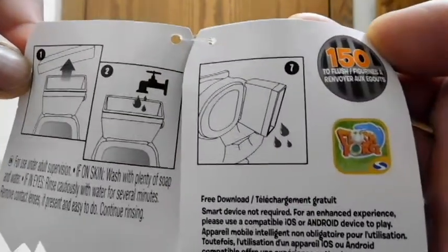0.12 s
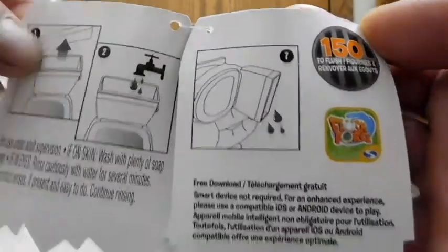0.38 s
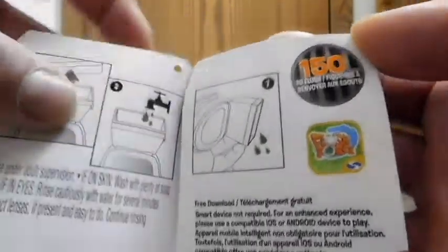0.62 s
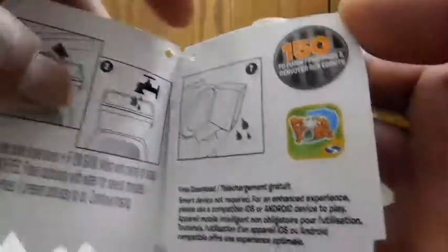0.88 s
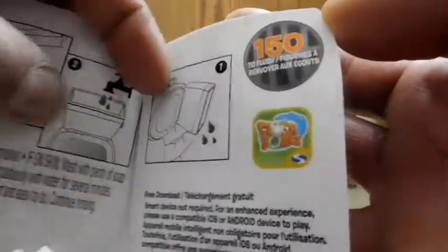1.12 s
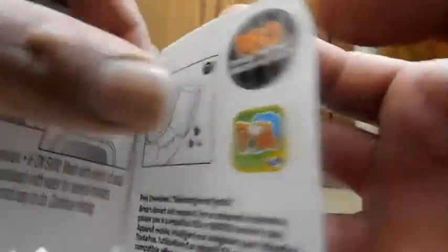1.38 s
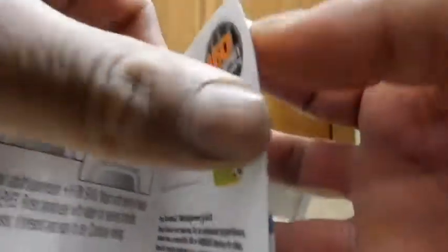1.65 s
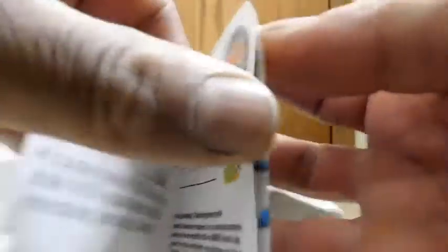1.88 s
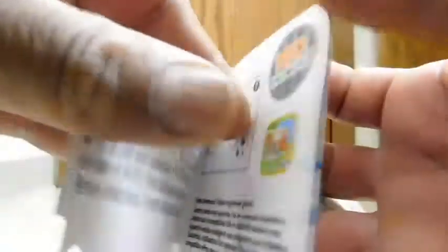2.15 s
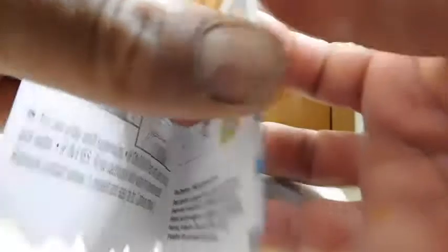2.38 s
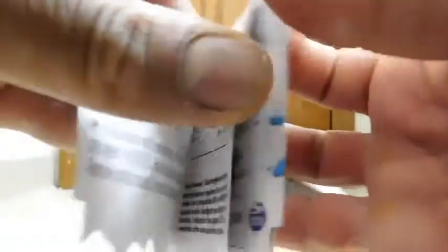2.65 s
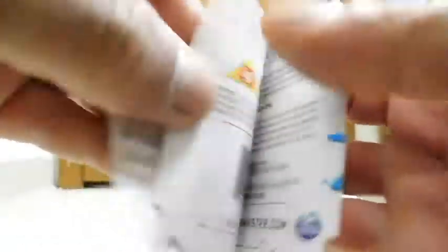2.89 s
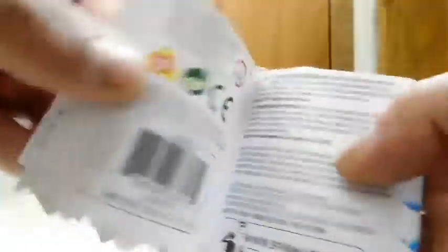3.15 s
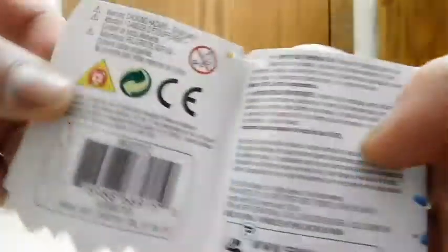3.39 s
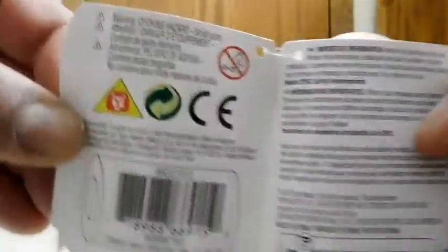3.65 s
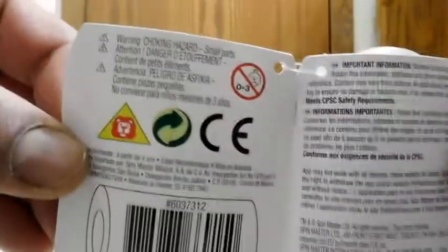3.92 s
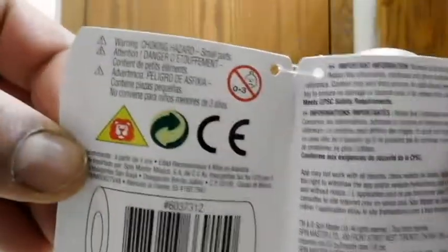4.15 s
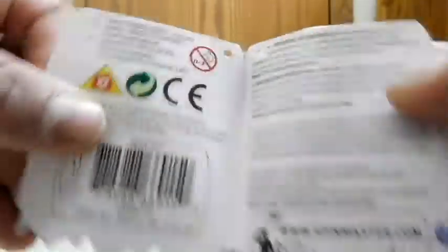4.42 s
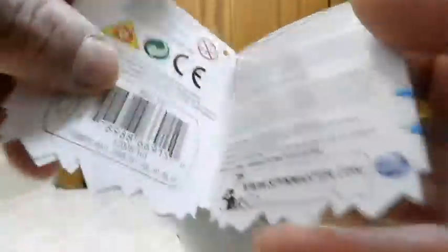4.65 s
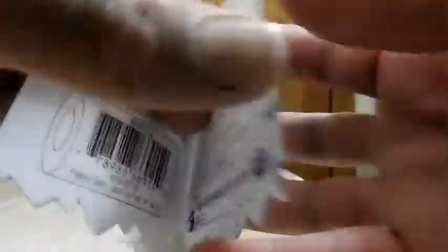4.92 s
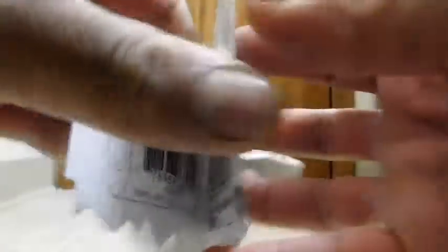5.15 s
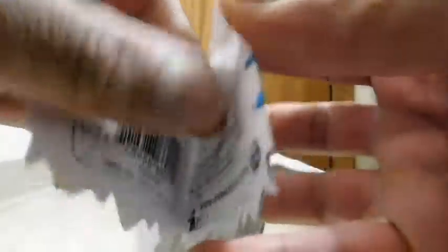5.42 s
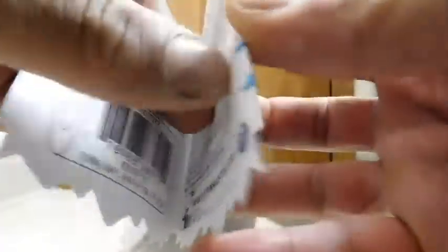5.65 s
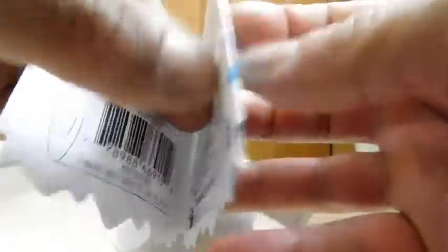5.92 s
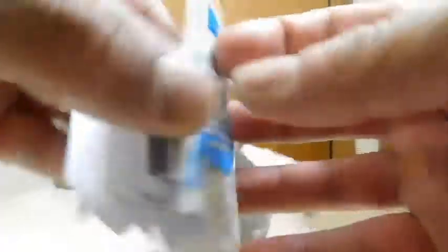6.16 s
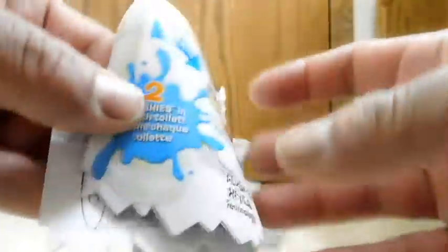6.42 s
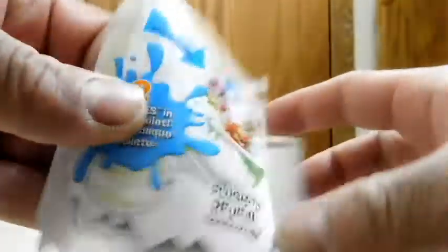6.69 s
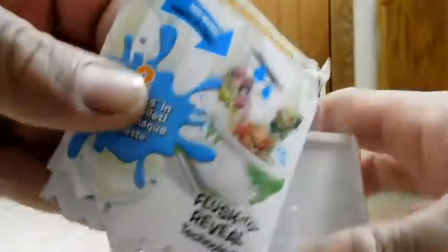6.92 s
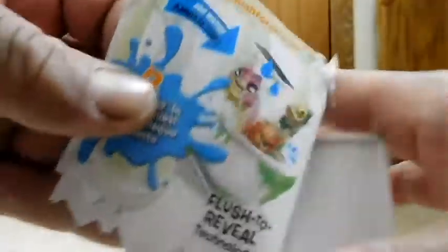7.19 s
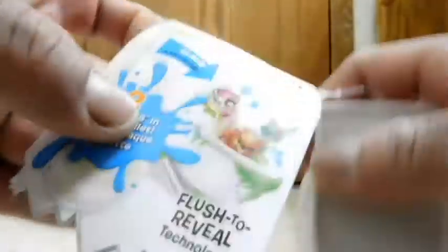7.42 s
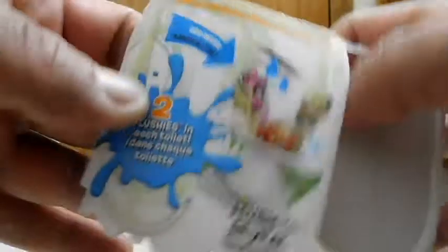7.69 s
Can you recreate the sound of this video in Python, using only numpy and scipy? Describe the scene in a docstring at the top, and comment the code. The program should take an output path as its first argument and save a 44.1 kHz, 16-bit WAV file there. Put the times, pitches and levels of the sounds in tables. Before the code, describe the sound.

Fingers turn and bend thin but stiff pages right by the microphone. Creases pop with short papery ticks, some with small dull thumps, and dry skin whispers across the sheets. The bursts are irregular, with near-quiet holds between them and the busiest crackling toward the end. A short room echo follows each snap, above steady low hum and soft air noise.

```python
"""Turning the pages of a paper leaflet

Fingers turn small stiff pages close to a stereo microphone, over mains hum, room air and hiss.
Creases snap as short decaying tones with thumps and noisy cracks; fingertips slide as filtered random slips.
A soft rustle of noise and ticks follows the hands, and low body thumps accompany some of the snaps.
A small hard room answers the snaps and slides with sparse, dying echoes."""
import sys
import numpy as np
from scipy import signal
from scipy.fft import rfft, irfft
from scipy.io import wavfile
from scipy.ndimage import uniform_filter1d

SR = 44100
rng = np.random.default_rng(int(sys.argv[2]) if len(sys.argv) > 2 else 0)


def digitize_waveform(pressure):
    """Quantize a signal to 16-bit integers and store it at the path in sys.argv[1].

    Rows of a 2-D input are taken as channels; values are limited to [-1, 1].
    """
    field = np.atleast_2d(pressure).T
    bounded = np.clip(field, -1, 1)
    quanta = np.round(bounded * 32767).astype(np.int16)
    wavfile.write(sys.argv[1], SR, quanta)


def invert_db(level):
    """Linear amplitude ratio for a level in decibels (20 dB per decade), elementwise."""
    return 10 ** (np.asarray(level, dtype=float) / 20)


N = 344332  # length of the scene in samples

# how the pages are held: t/s, thump relative to patch/dB, air pocket ring/dB,
# cycles until a patch dies to about a third
GRIP = [(.5, -4, -4, 0.94), (1.4, -47, -7, 0.95), (1.8, -10.5, -6, 1.7), (2.2, -4, -12, 1.2),
        (2.9, -9, 3.5, 1.5), (3.5, -12, -15, 0.71), (4.4, -11.5, -0.5, 0.77), (4.55, -7, -3.5, 1.9),
        (5.4, -2, 0, 0.35), (5.9, -3, -5, 1.4), (6.5, -10, 0.5, 3.5), (7.3, -6.5, 5, 2.2),
        (7.55, -28, -11.5, 0.44)]


def evened(x):
    """Scales a sound to an rms of 1."""
    return x / np.sqrt(np.mean(x ** 2) + 1e-20)


def read(points, hz):
    """Reads a table between its points on a log-frequency axis."""
    f, value = np.transpose(points)
    return np.interp(np.log(hz + 1), np.log(f + 1), value)


def add(mix, s, sound):
    """Mixes a two-channel sound in at time s, cut off at the end of the mix."""
    part = mix[:, round(s * SR):][:, :sound.shape[1]]
    part += sound[:, :part.shape[1]]


def band(x, lo_hz, hi_hz):
    """Keeps the pitches between two limits, using a filter that never looks ahead."""
    limits = [lo_hz, min(hi_hz, SR * .45)]
    return signal.sosfilt(signal.butter(2, limits, "bandpass", fs=SR, output="sos"), x)


def noise(shape_db, same):
    """Makes two partly alike channels of noise with a given spectrum and an rms of 1."""
    hz = np.fft.rfftfreq(N, 1 / SR)
    left, other = rfft(rng.standard_normal((2, N)))
    alike = np.clip(read(same, hz), 0, 1)
    right = alike * left + np.sqrt(1 - alike ** 2) * other
    return evened(irfft(np.array([left, right]) * invert_db(read(shape_db, hz)), N))


def panned(x, db):
    """Splits a left-right level step in half over both channels."""
    return x * invert_db(np.outer([.5, -.5], db))


def air():
    """Room air and microphone hiss: steady noise, alike in both channels only in the bass."""
    # colour of the noise: f/Hz, relative level per Hz/dB
    colour = [(27, 5), (42, 0), (150, -4), (330, -3), (600, -5.5), (1200, -2), (2200, -5.5), (4000, -12),
              (8000, -18.5), (16000, -19)]
    # how alike left and right are: f/Hz, likeness (0 to 1)
    same = [(60, 0.79), (1000, 0.011), (3000, 0)]
    return invert_db(-53) * noise(colour, same)


def hum():
    """Mains hum: steady tones locked to multiples of twice the mains frequency."""
    # tones of the hum: multiple, rms level before panning/dB, left-right step/dB, lead of left/rad
    tones = [(1, -52.5, -0.8, 0.07), (3, -68.5, -5.5, 0.46), (8, -62.5, -4, -0.6), (9, -71, 20.5, -2),
             (10, -52, -0.5, 0.18), (11, -62, 5, 1.26)]
    turn = 2 * np.pi * 120.028 * np.arange(N) / SR  # 120.028 Hz is twice the mains frequency
    total = np.zeros((2, N))
    for multiple, db, pan_db, lead in tones:
        phase = np.array([[lead], [0]]) + rng.uniform(0, 2 * np.pi)
        total += panned(np.sqrt(2) * invert_db(db) * np.cos(multiple * turn + phase), pan_db)
    return total


def low_thumps():
    """Low body thumps under some of the snaps: a few deep tones that start softly and die away."""
    # low thumps: t/s, strength/dB
    thumps = [(0.53, -42.5), (1.845, -43.5), (2.192, -39), (3.748, -42), (4.383, -39), (4.546, -41.5),
              (7.282, -43.5), (7.526, -42)]
    # low tones of the thump: f/Hz, relative level/dB, time to fall by 60 dB/s
    tones = [(156, 14, 0.028), (267, 0, 0.074), (316.4, 4.5, 0.083)]
    t = np.arange(SR // 2) / SR
    pulses = np.zeros(N)
    for s, db in thumps:
        pulses[round(s * SR)] = invert_db(db)
    body = sum(invert_db(db - 60 * t / t60) * np.sin(2 * np.pi * hz * t) for hz, db, t60 in tones)
    soft_start = 1 - np.exp(-t / 0.0047)
    return signal.oaconvolve(pulses, body * soft_start)[:N]


def rustle(ticks_per_s=150, spread_db=3.5, tick_db=-2):
    """Moving hands make the sheets rustle: an uneven wash of noise with small random ticks."""
    # how loud the rustle is: t/s, level before the ticks are added/dB
    s, level_db = np.transpose([(0, -97), (0.39, -66), (0.429, -57.5), (1.3, -62.5), (2.801, -57),
                                (3.1, -50.5), (3.7, -62), (3.85, -79), (4.28, -90), (4.45, -48.5),
                                (4.75, -62.5), (6.35, -61.5), (6.601, -60), (7.349, -60), (7.8, -59.5)])
    # colour of the papery wash: f/Hz, relative level per Hz/dB
    colour = [(300, -7.5), (800, -4), (2400, -2), (4500, -15.5), (8000, -14), (16000, -21.5)]
    tick_sizes = invert_db(spread_db * np.minimum(rng.exponential(1, N), 3))
    ticks = (rng.random(N) < ticks_per_s / SR) * tick_sizes
    ticks = evened(band(ticks, 870, 3460))
    lumps_db = 3.8 * evened(uniform_filter1d(rng.standard_normal(N), size=1500))
    wash = noise(colour, [(500, 0.99), (4000, 0.056)]) * invert_db(lumps_db)
    level = invert_db(np.interp(np.arange(N) / SR, s, level_db))
    return level * (wash + invert_db(tick_db) * ticks)


def room(x):
    """A small hard room: sparse echoes of random sign, each pitch range dying at its own speed."""
    # how long echoes last: f/Hz, time to fall by 60 dB/s
    decay = [(300, 0.41), (2000, 0.49), (6000, 0.37), (15000, 0.57)]
    taps = np.zeros((2, SR // 2))
    starts = np.arange(200, SR // 2 - 20, 20)
    at = starts + rng.integers(0, 20, (2, len(starts)))  # one echo in every 20 samples
    np.put_along_axis(taps, at, rng.choice([-1., 1.], at.shape), 1)
    hz, t, z = signal.stft(taps, SR, nperseg=256)
    fading = z * invert_db(-60 * t / read(decay, hz)[:, None])
    tail = signal.istft(fading, SR, nperseg=256)[1]
    tail = tail / np.linalg.norm(tail[0])
    return signal.fftconvolve(x.mean(0)[None], tail, axes=1)[:, :N]


def slide(length, level_db, hz, hiss_db, slips_per_cycle=.3, spread_db=5):
    """Uneven slips of skin on paper: trapped air whistles, wider and brighter for a rougher stroke."""
    n = round(length * SR)
    sizes = invert_db(spread_db * np.minimum(rng.exponential(1, (3, n)), 3))
    slips = (rng.random((3, n)) < slips_per_cycle * hz / SR) * sizes
    slips = (slips[0] + .7 * slips[1:]) * rng.choice([-1, 1], n)  # one shared set, two separate ones
    slips = slips + .15 * rng.standard_normal((2, n))
    slips = np.pad(slips * signal.windows.tukey(n, .5), ((0, 0), (0, 1500)))  # room to ring out
    wide = 1 + 1700 * invert_db(hiss_db) / hz
    whistle = evened(band(slips, hz / wide, hz * wide))
    scrape = 2.97 * evened(band(slips, 720, 2670)) + evened(band(slips, 8100, 13900))
    make_up = np.sqrt(slips.shape[1] / n)  # makes up for the silent padding
    return invert_db(level_db) * (whistle + invert_db(hiss_db) * scrape) * make_up


def slides():
    """Skin or a page edge slides over a sheet; a closing grip shuts the pockets and alters the scrape."""
    # strokes: t/s, length/s, rms level of the whistle before panning/dB, whistle f/Hz
    strokes = [(0.406, 0.073, -61.5, 2520), (0.824, 0.063, -62, 2760), (1.864, 0.092, -60, 1940),
               (2.671, 0.013, -61.5, 2220), (2.844, 0.034, -56, 2570), (3.01, 0.02, -48.5, 2550),
               (3.063, 0.044, -54, 2440), (3.109, 0.011, -59, 2400), (4.327, 0.065, -56.5, 2290),
               (4.486, 0.018, -62, 2210), (4.561, 0.011, -53.5, 2020), (4.581, 0.02, -65, 2020),
               (4.624, 0.011, -60.5, 3430), (5.361, 0.032, -50, 2930), (5.64, 0.07, -66, 6300),
               (5.72, 0.08, -60.5, 3120), (5.877, 0.06, -61, 6760), (5.942, 0.03, -61, 7050),
               (6.031, 0.052, -65, 6750), (6.162, 0.12, -60, 2020), (6.762, 0.048, -59, 2220),
               (6.976, 0.068, -56, 3070), (7.105, 0.093, -59, 3060), (7.198, 0.06, -54, 2500),
               (7.375, 0.011, -55, 2700), (7.505, 0.064, -59, 3480)]
    held_s, _, ring_db, _ = np.transpose(GRIP)
    total = np.zeros((2, N))
    for s, length, db, hz in strokes:
        # scrape relative to whistle: it falls by 1.33 dB for each dB of pocket ring
        hiss_db = -13.5 - 1.33 * np.interp(s, held_s, ring_db)
        add(total, s, slide(length, db, hz, hiss_db))
    return total


def ring(hz, near=.11):
    """Air pockets nearest in pitch to the moving patch ring on, each as a close pair that beats."""
    # air pockets between pages and hands: f/Hz, relative level/dB, time to fall by 60 dB/s
    pockets = [(1940, -3.5, 0.043), (2426, -15.5, 0.037), (3600, -10, 0.0055)]
    t = np.arange(3000) / SR
    total = np.zeros(len(t))
    for _ in range(2):
        for f, db, t60 in pockets:
            closeness = np.exp(-(np.log(f / hz) / near) ** 2)
            tone = np.sin(2 * np.pi * f * rng.uniform(.96, 1.04) * t)
            total += invert_db(db - 60 * t / t60) * closeness * tone
    return total


def snap(peak_db, hz, thump_db, crack_db, ring_db, cycles):
    """A crease buckles: a ringing patch, a push of air, a crack, a crackle and a bounce off the next page."""
    t = np.arange(3000) / SR
    rise = 1 - np.exp(-t / .00013)
    burst = rng.standard_normal((3, len(t))) * rise
    flex = np.exp(-t * hz / max(cycles, .3)) * np.sin(2 * np.pi * hz * t)
    patch = -rise * (flex + invert_db(ring_db) * ring(hz))
    patch = patch + min(hz / 5000, .5) * band(burst[0] * np.exp(-t / 0.00068), 2830, 6330)
    strength = np.linalg.norm(patch[:150])  # the other parts are set relative to this
    thump = -band(1. * (t == 0), 510, 1900)
    crack = band((burst[0] + burst[1:]) * np.exp(-t / 0.0009), 1600, 12400)
    sound = patch + strength * invert_db(thump_db) * thump / np.linalg.norm(thump)
    sound = sound + strength * invert_db(crack_db) * crack / np.linalg.norm(crack[0])
    jumps = rng.standard_normal((2, len(t))) * rng.exponential(1, len(t)) ** 2
    crackle = band(jumps * rise * np.exp(-t / 0.038), 660, 6600)
    sound = sound + strength * invert_db(crack_db - 2.0) * crackle / np.linalg.norm(crackle[0])
    late = round(rng.uniform(0.0015, 0.002535) * SR)
    sound[:, late:] += 0.39 * sound[::-1, :-late]  # the bounce swaps left and right
    return invert_db(peak_db) * sound / abs(patch).max()


def scattered(sound):
    """Fingers and pages scatter sound: quick reflections, opposite in sign at the two microphones."""
    t = np.arange(256) / SR
    swarm = band(rng.standard_normal(len(t)) * np.exp(-t / 0.00046), 2760, SR)
    swarm = invert_db(-6.5) * np.outer([1, -1], swarm / np.linalg.norm(swarm))
    return sound + signal.fftconvolve(sound, swarm, axes=1)[:, :sound.shape[1]]


def snaps():
    """Creases buckle one after another, each shaped by how the pages are held just then."""
    # creases: t/s, patch peak before scatter and panning/dB, patch f/Hz, crack relative to patch/dB
    creases = [(0.5325, -23, 2350, -7), (0.8187, -26.5, 3520, -6), (0.844, -37.5, 714, -17),
               (1.393, -32, 3280, 3.5), (1.423, -18.5, 2215, -7.5), (1.549, -35, 4270, -14),
               (1.753, -26, 1760, -11), (1.76, -34, 1950, -26), (1.8478, -20, 1730, -13),
               (1.845, -22.5, 2330, -14), (1.8535, -21.5, 1860, -20), (2.13, -35, 2500, -16),
               (2.187, -35, 2900, -3), (2.195, -30, 4000, -11), (2.198, -17.5, 5270, 0),
               (2.199, -12.5, 7200, -7), (2.203, -14, 2580, -4), (2.2048, -28, 2430, -24),
               (2.8632, -26, 2350, -12), (2.947, -29.5, 2780, -28), (2.962, -33, 3000, -28),
               (2.986, -33, 1020, -12), (3.0245, -24.5, 2620, -5.5), (3.095, -25.5, 2470, -21),
               (3.1404, -18, 2500, -19), (3.1832, -21, 2820, -12), (3.2989, -27.5, 1780, -38),
               (3.303, -20, 1780, -25), (3.31, -26, 1890, -25), (3.422, -24, 2410, -15),
               (3.4347, -24.5, 2730, -14), (3.593, -33, 3600, -10), (3.6144, -33, 3460, -9),
               (3.6434, -29.5, 3530, -16), (3.7479, -23, 2880, -22), (4.18, -41, 3700, -16),
               (4.219, -38, 3700, -14), (4.315, -18, 3320, -11), (4.3856, -20, 2250, -11.5),
               (4.391, -23, 3220, -19), (4.402, -21.5, 2820, -15), (4.4201, -22, 3000, -22),
               (4.4244, -22, 1520, -15), (4.5507, -21.5, 1190, -11), (4.572, -32, 1990, -5.5),
               (4.8723, -34.5, 2380, -3), (4.8868, -27, 2630, -30), (4.9337, -35, 1480, -11),
               (4.949, -28, 1590, -14), (5.1287, -37, 2450, -25), (5.2163, -35, 2410, -24),
               (5.38, -33.5, 1950, -1), (5.709, -38.5, 2870, -9), (5.82, -32.5, 3300, 2),
               (6.072, -38.5, 2600, -22), (6.4093, -30.5, 2320, -29), (6.4481, -23.5, 2260, -8.5),
               (6.4868, -21.5, 2270, -14.5), (6.5322, -34, 2400, -25), (6.5533, -21, 2230, -13.5),
               (6.5963, -33, 2290, -10), (6.6204, -17.5, 2320, -15), (6.716, -21, 2260, -9.5),
               (6.75, -25, 2270, -10.5), (6.7569, -25, 2420, -10), (6.8659, -33, 2480, -13),
               (7.205, -33, 2530, -21), (7.2563, -26, 2420, -11.5), (7.291, -24.5, 2670, -21),
               (7.3185, -25, 2500, -10), (7.3557, -28.5, 2780, -4.5), (7.3993, -29, 2420, -8),
               (7.4153, -24, 2530, -17), (7.533, -22.5, 3600, -9), (7.675, -34, 3220, -12)]
    held_s, thump_db, ring_db, cycles = np.transpose(GRIP)
    total = np.zeros((2, N))
    for s, db, hz, crack_db in creases:
        push_db = np.interp(s, held_s, thump_db) + rng.normal(0, 1.5)  # thumps vary from crease to crease
        pocket_db = np.interp(s, held_s, ring_db)
        lasting = np.interp(s, held_s, cycles)
        add(total, s, scattered(snap(db, hz, push_db, crack_db, pocket_db, lasting)))
    return total


def scene():
    """Paper near the microphone, its echo in the room, and the sounds around it."""
    # where the working hand is: t/s, left-right step/dB
    lean = [(.5, -1), (.8, -6), (1.4, 1), (2.9, -7), (3.4, 1), (4.4, -1.5), (6.4, -2.5), (7.8, -1.5)]
    lean_db = np.interp(np.arange(N) / SR, *np.transpose(lean))
    paper = panned(slides() + snaps(), lean_db)
    echo = invert_db(-6.5) * room(paper)
    return air() + hum() + low_thumps() + rustle() + echo + paper


def top_cut(x):
    """Nothing passes above the cut-off."""
    return signal.sosfilt(signal.butter(12, 16860, fs=SR, output="sos"), x)


def record(dry):
    """The microphone's top edge: a steep filter removes what lies above about 16 kHz."""
    edge = signal.firwin(255, 16000, window=("kaiser", 5), fs=SR)
    mix = signal.oaconvolve(dry, edge[None], "same")
    return top_cut(mix)


dry = scene()
out = record(dry)
digitize_waveform(out)
```